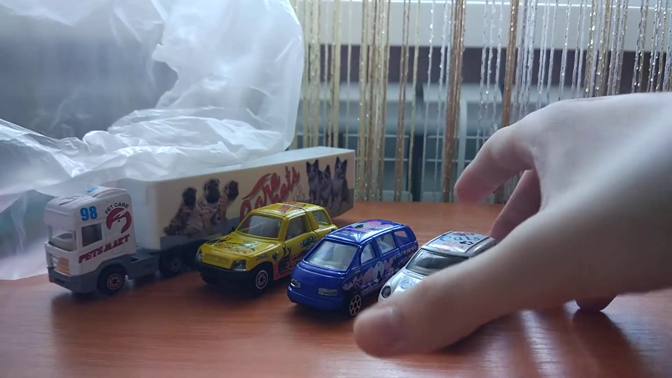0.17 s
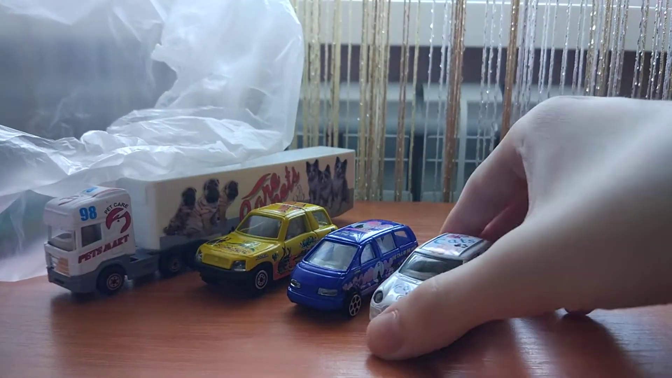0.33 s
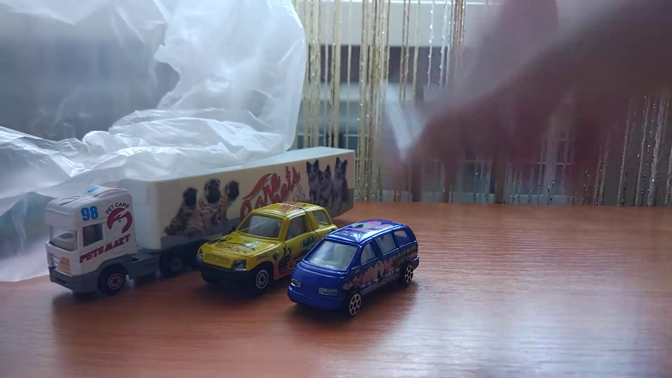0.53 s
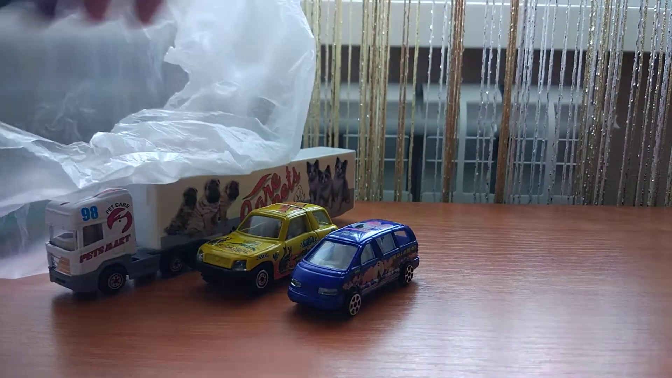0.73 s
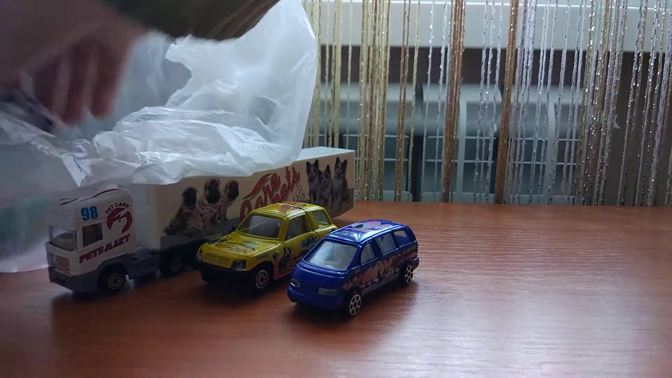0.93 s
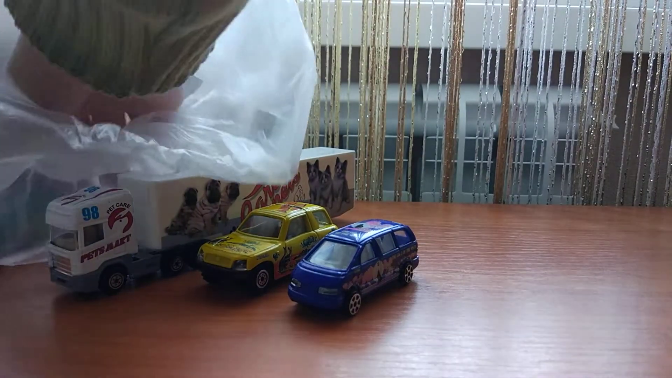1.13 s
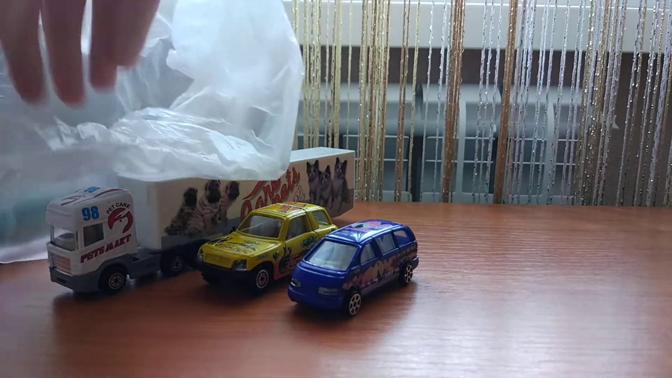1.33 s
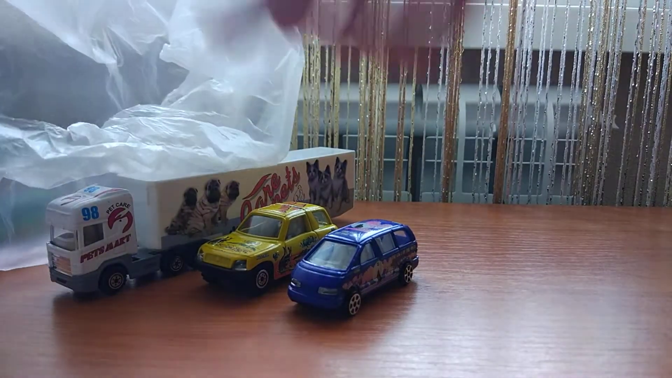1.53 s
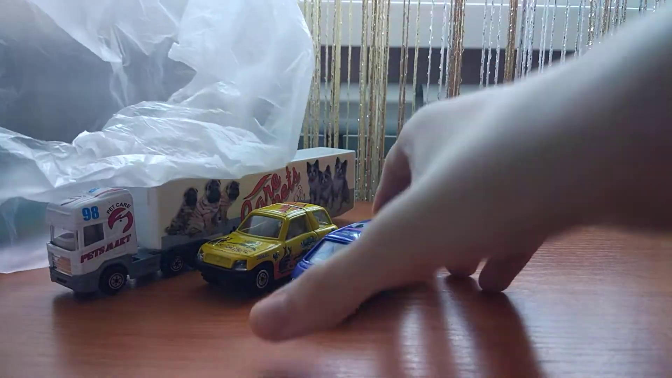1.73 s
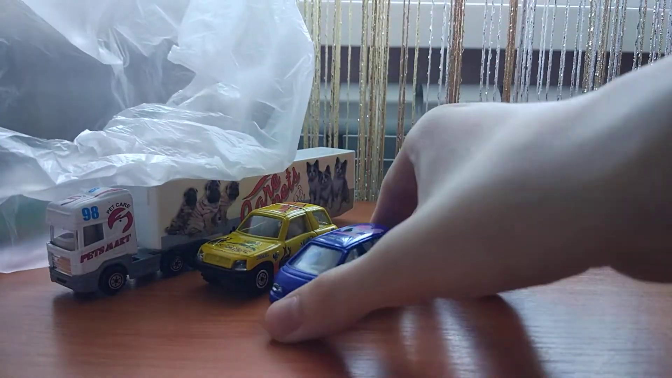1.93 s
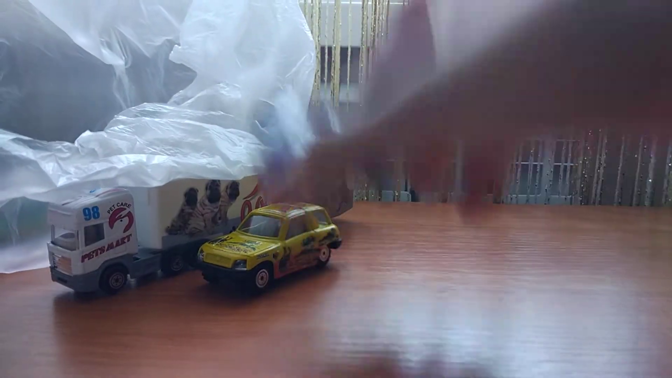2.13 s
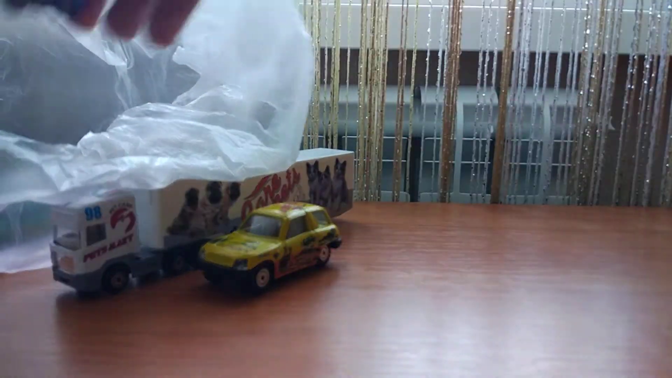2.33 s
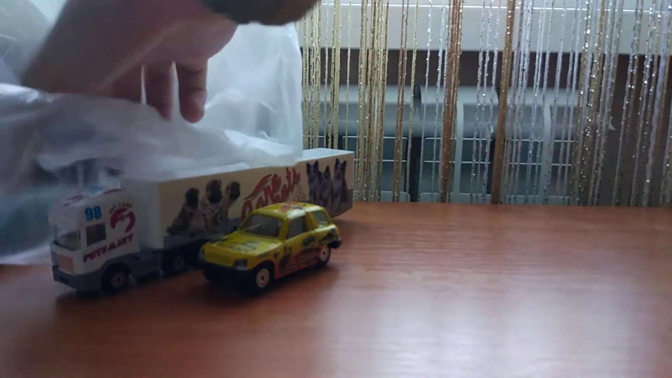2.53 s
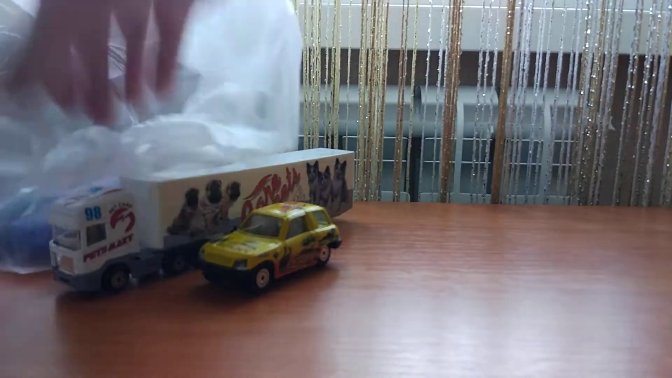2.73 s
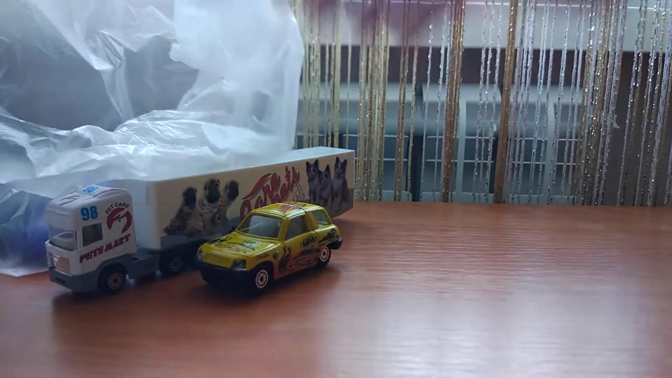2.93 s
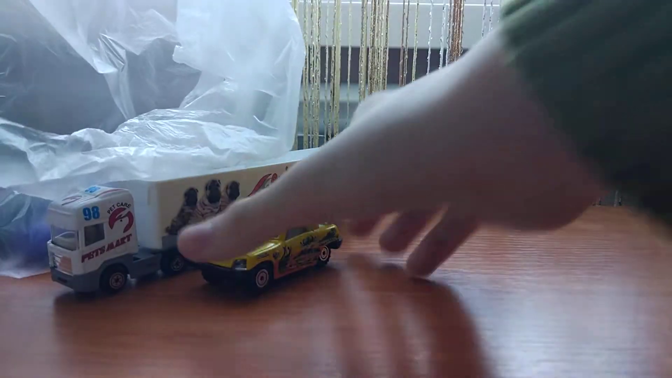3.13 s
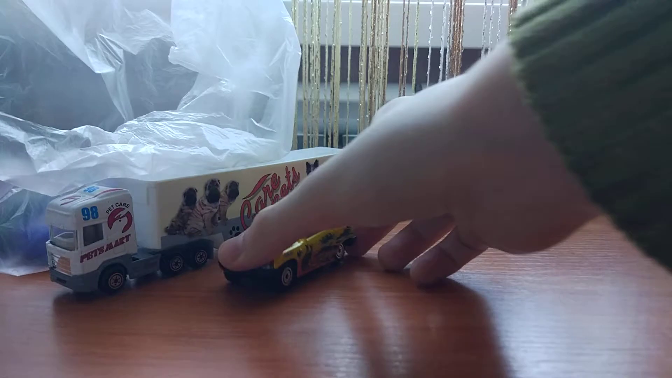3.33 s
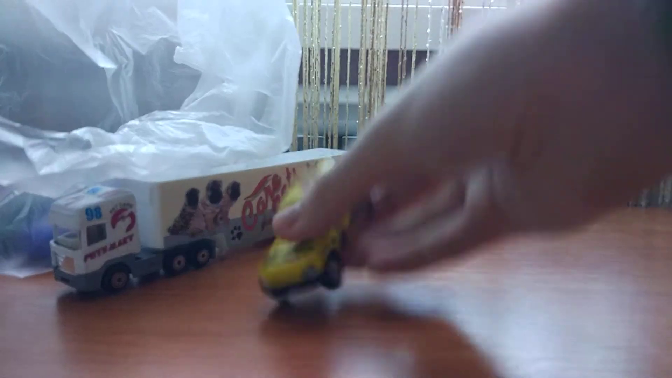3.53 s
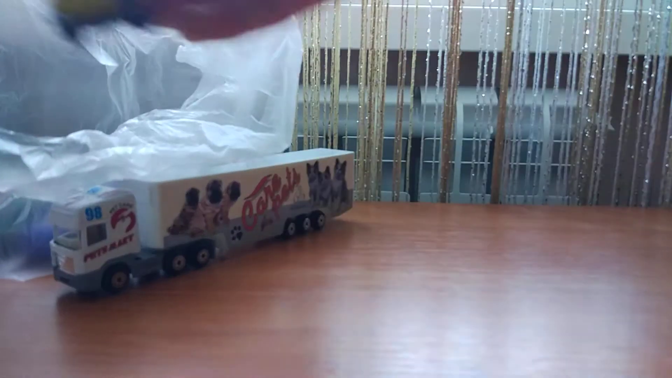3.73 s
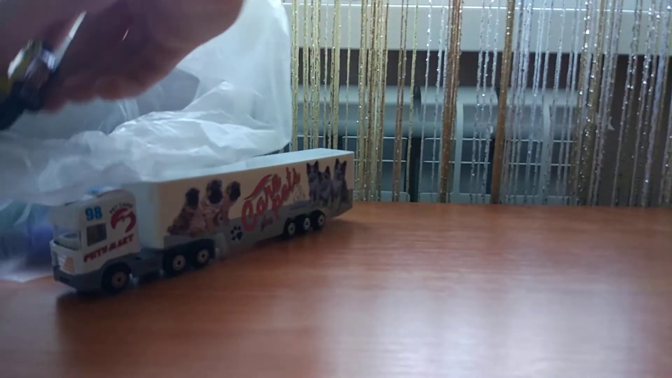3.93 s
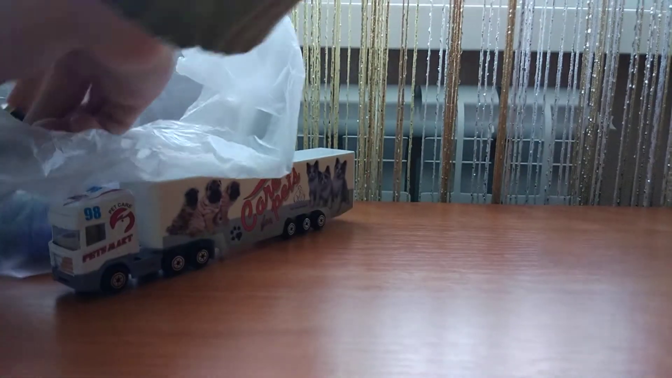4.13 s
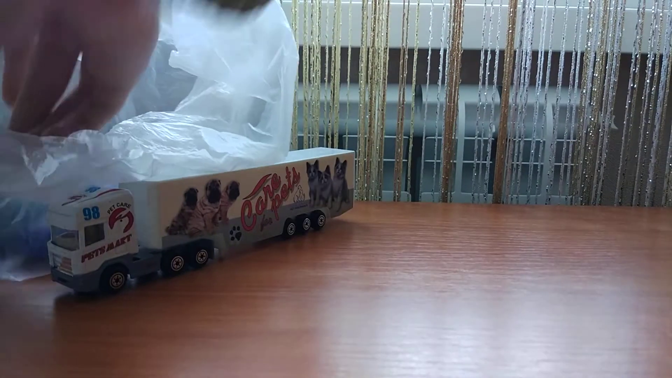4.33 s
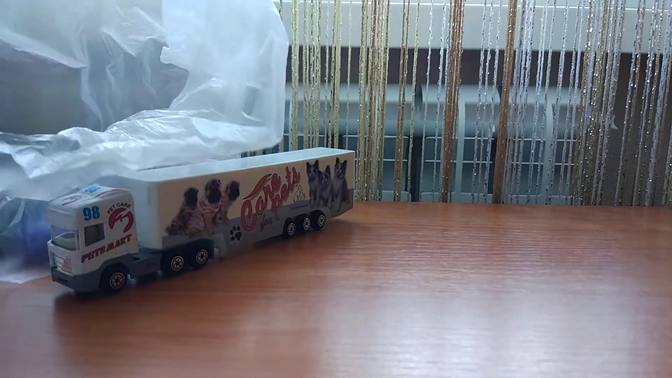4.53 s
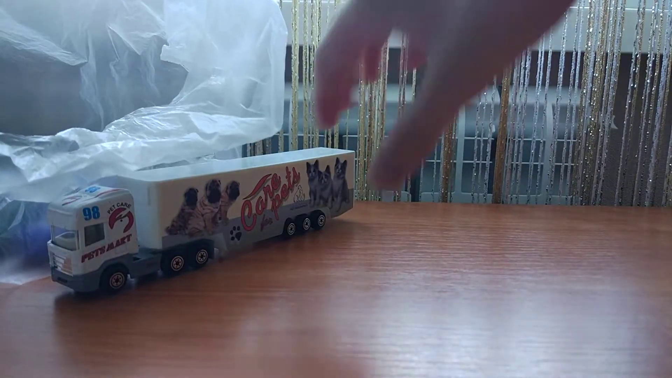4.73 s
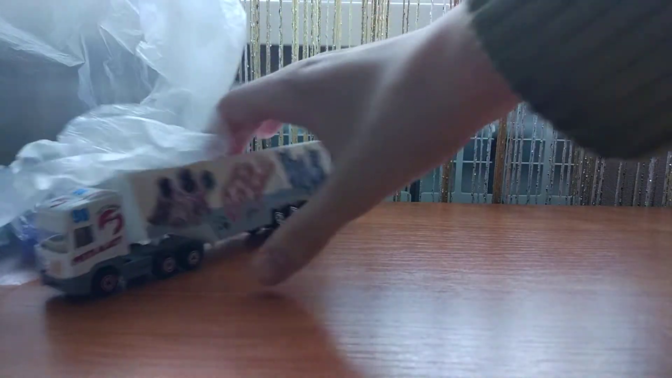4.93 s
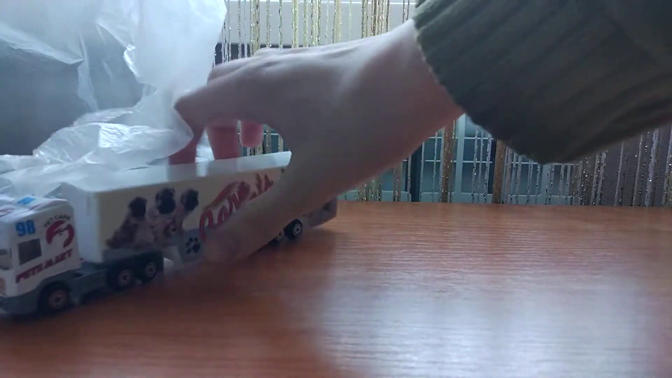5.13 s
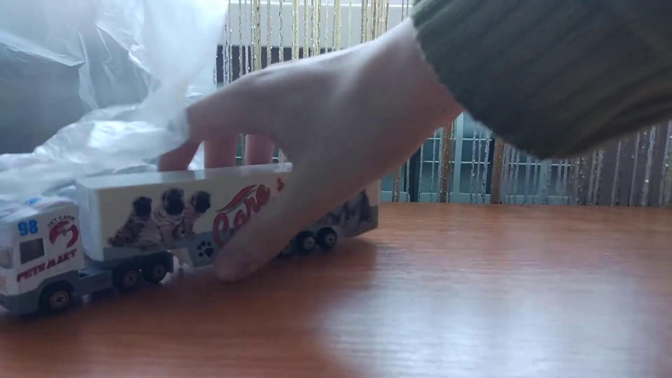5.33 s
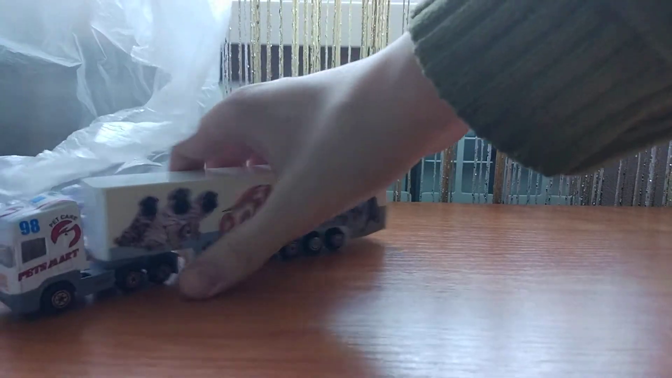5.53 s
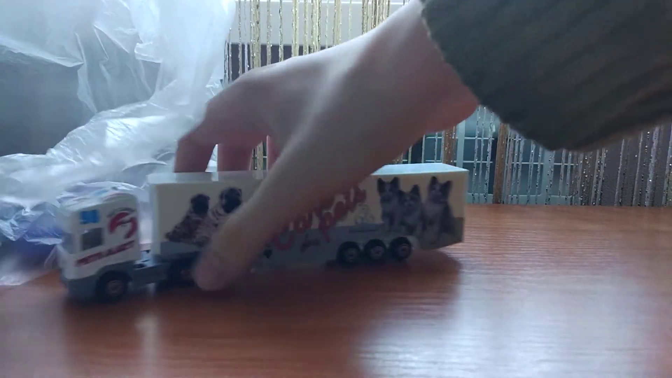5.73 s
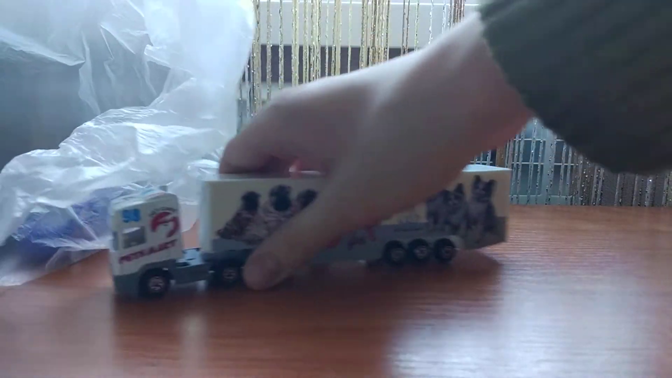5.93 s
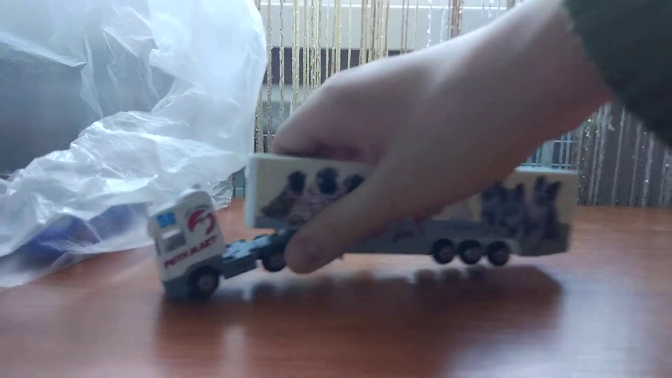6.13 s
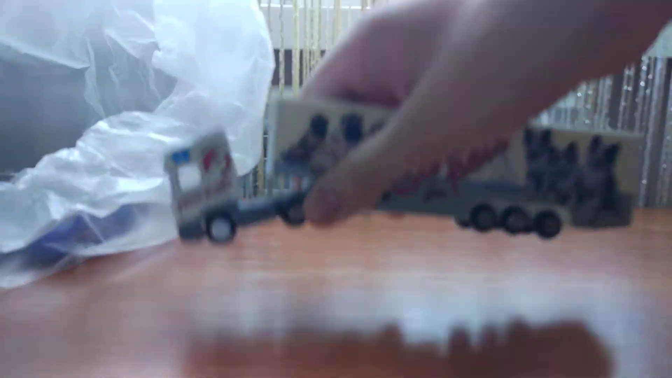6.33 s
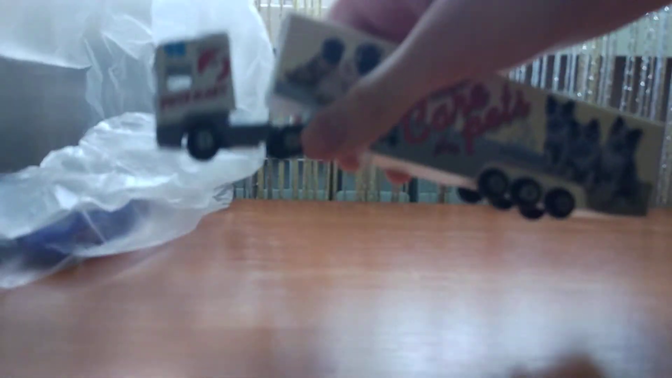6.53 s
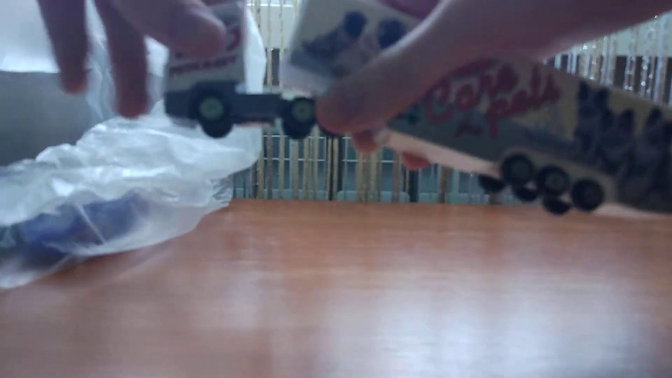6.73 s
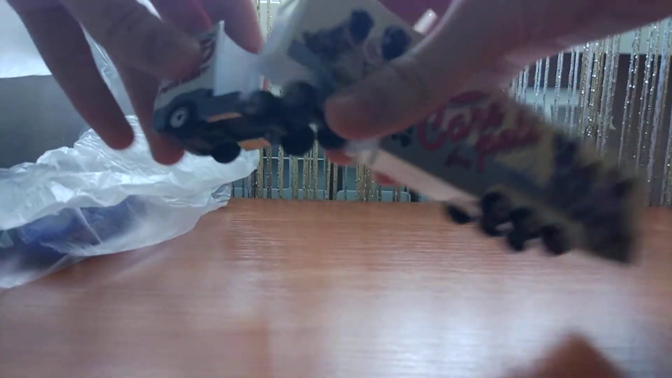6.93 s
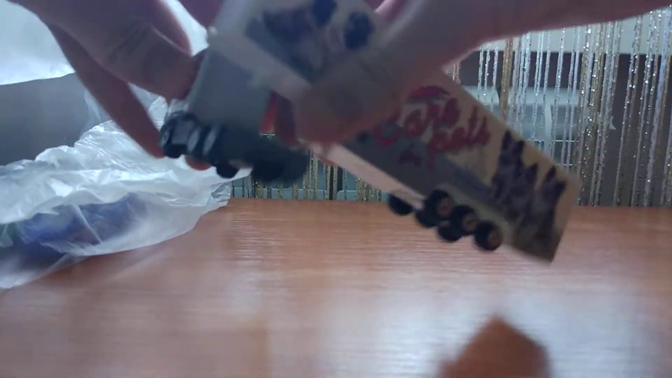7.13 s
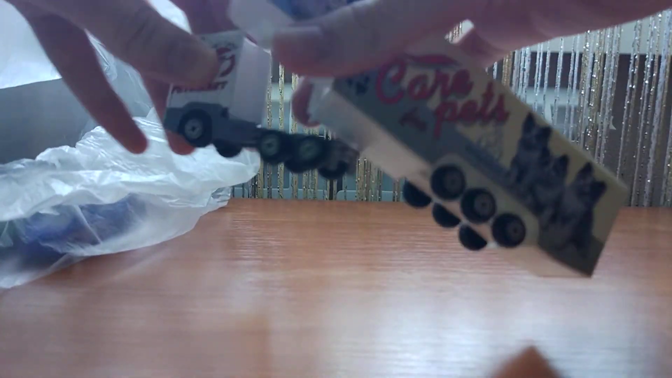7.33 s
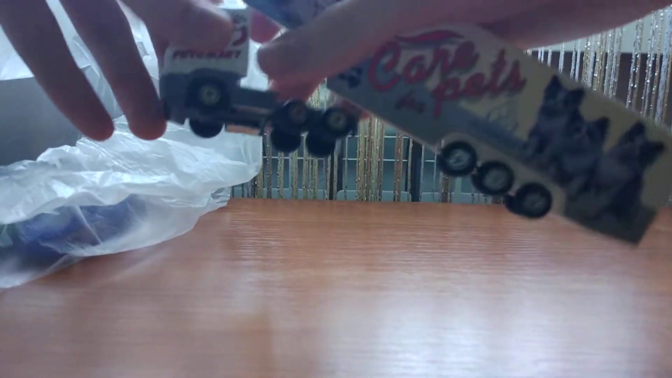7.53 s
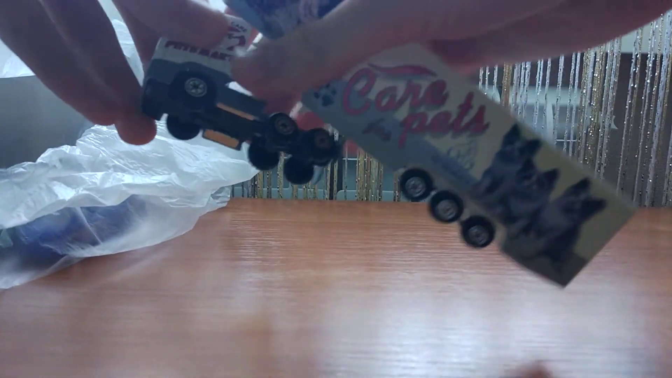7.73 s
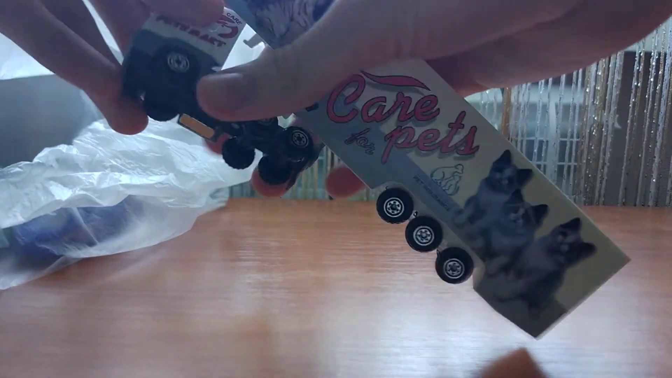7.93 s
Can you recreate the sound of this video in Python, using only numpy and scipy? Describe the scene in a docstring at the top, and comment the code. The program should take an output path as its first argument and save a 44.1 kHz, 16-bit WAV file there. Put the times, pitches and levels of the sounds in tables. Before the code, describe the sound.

A thin plastic bag crinkles as toy cars clatter inside, before a toy truck scrapes across wood and its loose cab clicks.

```python
"""You hear a thin plastic bag rustle and snap while small toy cars clack together inside it.
The cars are picked off a wooden table, where their wheels scrape, spin and drum on the top.
Then a plastic truck is lifted, and its loose cab rattles against the hollow trailer.
The room is small and quiet. Of the microphone's two openings (ports), the right one sounds dull."""
import sys
import numpy as np
from scipy import signal
from scipy.fft import rfft, irfft, next_fast_len
from scipy.io import wavfile
from scipy.ndimage import uniform_filter1d, map_coordinates

SR = 44100
rng = np.random.default_rng(int(sys.argv[2]) if len(sys.argv) > 2 else 0)


def transcribe(u):
    """Save the signal u as a 16-bit wav file named by the first command-line argument.

    u: samples, shape (n,) or (channels, n), limited to [-1, 1]; the rate is SR.
    q: integer samples, one column per channel.
    """
    v = np.clip(np.atleast_2d(u).T, -1, 1)
    q = np.round(v * 32767).astype(np.int16)
    wavfile.write(sys.argv[1], SR, q)


N = 351477
FFT_SIZE = 3 * 2 ** 17
ATTACK_S, SCRAPE_FADE_DB_PER_S = 0.007, 217

# the pitches at which the table top rings: (frequency [Hz], width [Hz], level [dB])
TABLE_RESONANCES = [(160, 9.9, -11.5), (224, 39, 5), (272, 53, 5), (325.5, 71, 2.5), (401.6, 31, -0.5),
                    (639, 24, -12)]
# the same for a toy's plastic shell: (frequency [Hz], width [Hz], level [dB])
SHELL_RESONANCES = [(463, 120, 2.5), (693, 108, 2), (970, 450, -2.5), (1364, 79, 8.5), (1635, 140, 6),
                    (2200, 540, 0), (3160, 380, 2)]
# the tone of the bag's thin film: (frequency [Hz], level [dB])
FILM_TONE = [(80, -38.5), (220, -1.5), (450, -3.5), (1800, -7.5), (3600, -6), (5200, -6), (7000, 1),
             (10000, 3.5), (15000, 1)]


def amp(db):
    """Turn decibels into a factor to multiply by."""
    return 10 ** (np.asarray(db) / 20)


def unit(x):
    """Scale a signal to an average power of 1."""
    return x / np.sqrt(np.mean(x ** 2) + 1e-20)


def along(points, hz):
    """Read between (frequency, value) points on a log frequency axis."""
    f, values = np.transpose(points)
    return np.interp(np.log(hz + 1), np.log(f), values)


def wobble(rate):
    """A smooth random curve that takes rate new values a second."""
    values = rng.standard_normal(int(N * rate / SR) + 4)
    return unit(map_coordinates(values, [np.arange(N) * rate / SR]))


def grid():
    """The frequencies on which filters are drawn."""
    return np.fft.rfftfreq(FFT_SIZE, 1 / SR)


def filtered(x, response):
    """Pass a sound through a filter, given as one gain per frequency."""
    return irfft(rfft(x, FFT_SIZE) * response)[..., :N]


def colour(points):
    """A filter of average power 1 with the given tone."""
    cepstrum = irfft(np.log(amp(along(points, grid()))))
    half = len(cepstrum) // 2
    cepstrum[1:half] *= 2  # folding keeps the filter from sounding before its input
    cepstrum[half + 1:] = 0
    response = np.exp(rfft(cepstrum))
    return response / np.sqrt(np.mean(abs(response) ** 2))


def body(resonances):
    """A filter of average power 1 for an object that rings, weak below its lowest pitch."""
    f = grid()
    response = sum((-1) ** k * amp(db) * 1j * f * width / (hz * hz - f * f + 1j * f * width)
                   for k, (hz, width, db) in enumerate(resonances))
    return response / np.sqrt(np.mean(abs(response) ** 2))


def add(track, at, sound):
    """Mix a sound into the track, starting at a time in seconds."""
    part = track[..., max(round(at * SR), 0):][..., :sound.shape[-1]]
    part += sound[..., :part.shape[-1]]


def stroke(start, length, attack, fade_db_per_s, swell_db=0):
    """The strength of a movement: it rises, holds or swells while it lasts, then fades."""
    t = np.arange(0, N, SR // 500) / SR - start
    swell = swell_db * (np.clip(t / length, 0, 1) - 1)
    return np.clip(t / attack, 0, 1) * amp(swell - fade_db_per_s * np.maximum(t - length, 0))


def together(strokes):
    """Add overlapping movements in power, giving one gain per sample."""
    return np.interp(np.arange(N), np.arange(0, N, SR // 500), np.linalg.norm(strokes, axis=0))


def ports(paths, lead_s, scatter_db):
    """A sound takes three paths: straight to both ports (left lead_s early), and a bounce to each."""
    f = grid()
    direct = filtered(paths[0], np.exp(1j * np.pi * f * lead_s * np.array([[1], [-1]])))
    # low sounds bend around small objects instead of bouncing off
    return direct + amp(scatter_db) * filtered(paths[1:], 1j * f / (1j * f + 1100))


def grains(rate, spread_db):
    """Tiny random clicks, about rate a second and a few of them large, on three paths."""
    size = amp(spread_db * np.clip(rng.standard_normal(N), -3, 2))
    return unit((rng.random(N) < rate / SR) * size * rng.uniform(-1, 1, (3, N)))


def pops(events, t60):
    """Short bursts of noise on three paths; t60 is the seconds they take to fade by 60 dB."""
    track, t = np.zeros((3, N)), np.arange(SR // 50) / SR
    shape = amp(-60 * t / t60) * (1 - np.exp(-t / .0004))
    for at, db in events:
        add(track, at, amp(db) * shape * rng.standard_normal((3, len(t))))
    return track


def contacts(times, levels, rise, t60, chatter_db, chatter_t60, spot_db, spot_hz):
    """Hits on three paths: each is a burst of force, then chatter as the parts settle."""
    track, t = np.zeros((3, N)), np.arange(next_fast_len(SR // 5)) / SR
    hz = np.fft.rfftfreq(len(t), 1 / SR)
    onset = 1 - np.exp(-(t / rise) ** 2)
    burst = onset * amp(-60 * t / t60)
    fade = np.cos(np.pi / 2 * t / t[-1])
    for at, db in zip(times, levels):
        ticks = unit(uniform_filter1d(rng.exponential(size=len(t)) ** 4, size=24))
        chatter = onset * amp(chatter_db - 60 * t / chatter_t60) * np.sqrt(abs(ticks))
        force = (burst / burst.max() + chatter) * rng.standard_normal((3, len(t)))
        # each spot that is hit favours its own pitches, in bands spot_hz wide
        bands = map_coordinates(rng.uniform(-1, 1, len(hz)), [hz / spot_hz], mode="nearest")
        spot = unit(amp(spot_db * bands))
        add(track, at, amp(db) * irfft(rfft(force) * spot, len(t)) * fade)
    return track


def ringing(notes, t):
    """The fading notes of an object struck once, a little different each time."""
    return sum(amp(db + 2 * rng.normal() - 60 * t / t60)
               * np.sin(2 * np.pi * hz * rng.normal(1, .004) * t) for hz, db, t60 in notes)


def air():
    """A steady room murmur, shared by both ports in the bass, with a faint hiss."""
    # the tone of the quiet room: (frequency [Hz], level [dB])
    murmur_tone = [(60, -46), (140, -15), (210, 0), (450, -12), (3500, -15), (15000, -20.5)]
    shared, side = filtered(rng.standard_normal((2, N)), colour(murmur_tone))
    side = filtered(side, grid() / (grid() + 500))
    return amp(-62) * np.array([shared + side, shared - side])


def room(x):
    """The walls give each port a short wash of echoes that lasts longest at middle pitches."""
    # how long the echoes last: (frequency [Hz], time to fade by 60 dB [s])
    echo_times = [(200, 0.14), (1500, 0.28), (6000, 0.23), (15000, 0.12)]
    hz, t, noise = signal.stft(rng.standard_normal((2, SR // 2)), SR, nperseg=256)
    fade = amp(-60 * t / along(echo_times, hz)[:, None])
    onset = 1 - np.exp(-t / 0.00067)
    tail = signal.istft(noise * fade * onset, SR, nperseg=256)[1]
    return signal.fftconvolve(x[None], tail / np.linalg.norm(tail[0]), axes=1)[:, :N]


def chafing():
    """A spinning wheel rubs its axle once a turn, in quick slips that make both ring."""
    # a wheel spins: (start [s], length [s], level [dB])
    spins = [(0.625, 0.028, -53.5), (2.04, 0.26, -65), (3.28, 0.19, -50.5), (7.76, 0.063, -49)]
    # the pitches of wheel and axle: (frequency [Hz], width [Hz], level [dB])
    wheel_resonances = [(1420, 120, -7), (1910, 110, 8), (2580, 2200, -3.5)]
    turns_per_s, sharpness = 31.74, 6.3  # sharper means a briefer touch
    start, length, db = np.transpose(spins)[..., None]
    rub = together(amp(db) * stroke(start, length, ATTACK_S, SCRAPE_FADE_DB_PER_S))
    touch = unit(np.exp(sharpness * np.cos(2 * np.pi * turns_per_s * np.arange(N) / SR)))
    return filtered(rub * touch * grains(4000, spread_db=0), body(wheel_resonances))


def juddering():
    """A gripped toy sticks and slips in step with the table top: a short wooden groan."""
    # the toy judders: (start [s], length [s], level [dB])
    judders = [(0.264, 0.076, -48.5), (1.891, 0.047, -41), (3.254, 0.02, -49)]
    groan_hz = 246
    start, length, db = np.transpose(judders)[..., None]
    grip = together(amp(db) * stroke(start, length, ATTACK_S, SCRAPE_FADE_DB_PER_S))
    cycles = np.cumsum(groan_hz * (1 + .05 * wobble(50))) / SR
    paths = np.zeros((3, N))
    paths[0] = grip * unit(amp(2 * wobble(70)) * np.sin(2 * np.pi * cycles))
    return paths


def dragging():
    """Wheels and fingers catch on the wood in tiny slips, rattling the toy and drumming the table."""
    # a toy is dragged: (start [s], length [s], scrape [dB], drumming [dB])
    drags = [(1.252, 0.24, -49, -46.5), (1.876, 0.072, -52.5, -50.5), (2.716, 0.13, -45, -41.5),
             (3.125, 0.2, -64.5, -58), (3.26, 0.027, -44.5, -48.5), (3.303, 0.18, -53, -63),
             (4.429, 0.077, -42.5, -39), (4.886, 0.44, -40.5, -47.5), (5.035, 0.12, -40, -42.5),
             (5.53, 0.24, -43, -48.5), (5.824, 0.041, -33, -40.5), (5.87, 0.21, -41, -53)]
    # the tone of scraping on wood: (frequency [Hz], level [dB])
    scrape_tone = [(50, -46), (200, -11), (800, -3.5), (1400, -5), (2400, 2), (4600, -8), (15000, -12)]
    start, length, scrape_db, drum_db = np.transpose(drags)[..., None]
    scrape = together(amp(scrape_db) * stroke(start, length, ATTACK_S, SCRAPE_FADE_DB_PER_S))
    drum = together(amp(drum_db) * stroke(start, length, ATTACK_S, fade_db_per_s=179))
    catches = amp(3.3 * wobble(85))
    slips = scrape * catches * grains(5000, spread_db=2)
    rattle = amp(-3) * scrape * catches * grains(170, spread_db=1)
    bumps = amp(4) * drum * grains(830, spread_db=6)
    toy = filtered(slips, colour(scrape_tone)) + filtered(rattle, body(SHELL_RESONANCES[2:]))
    return toy + filtered(bumps, body(TABLE_RESONANCES))


def axles():
    """Loose, thin steel axles hit their stops with high ticks."""
    # each tick: (time [s], level [dB])
    ticks = [(7.1627, -18.5), (7.607, -26), (7.6905, -17), (7.8476, -21.5), (7.866, -45)]
    pitch_hz, width_hz = 10200, 1200
    return filtered(pops(ticks, t60=0.011), body([(pitch_hz, width_hz, 0)]))


def truck():
    """The cab swings on its hitch: dry clicks, and knocks that sound the hollow trailer."""
    # the truck bumps and its cab rattles: (time [s], click [dB], knock [dB])
    rattles = [(4.956, -22, -32), (4.972, -29, -32), (5.121, -22.5, -29), (5.6185, -24, -33.5),
               (5.701, -44, -40), (5.8112, -21.5, -30.5), (6.093, -30.5, -45), (6.7141, -30, -43.5),
               (6.9244, -29.5, -37), (6.9668, -20.5, -34), (7.1379, -25.5, -50.5), (7.3198, -26.5, -38),
               (7.341, -12.5, -27), (7.3519, -16.5, -29.5), (7.409, -26, -32.5), (7.555, -29.5, -40),
               (7.5683, -16.5, -32), (7.5905, -18.5, -38), (7.664, -22, -32), (7.6788, -27.5, -33.5),
               (7.8464, -23, -38.5), (7.9275, -32.5, -43.5)]
    # bumps on the trailer, lower for a softer touch: (time [s], pitch [Hz], level [dB])
    taps = [(5.8114, 910, -19), (6.9255, 524, -25.5), (6.9672, 473, -23.5), (7.3203, 650, -26),
            (7.664, 420, -30.5)]
    # the tone of a plastic click: (frequency [Hz], level [dB])
    click_tone = [(80, -22), (1000, -9.5), (1800, -6), (3200, 1.5), (5000, 2.5), (6600, 3), (11000, 7.5),
                  (12500, -1), (16000, -8)]
    times, click_db, knock_db = np.transpose(rattles)
    click = contacts(times, click_db - 7.5, rise=0.0013, t60=0.012,
                     chatter_db=-2.5, chatter_t60=0.19, spot_db=11, spot_hz=554)
    knock = contacts(times, knock_db + 2, rise=0.0006, t60=0.024,
                     chatter_db=-8, chatter_t60=0.11, spot_db=6, spot_hz=200)
    # the first touch is one sharp push on the shell, strongest after 0.1 ms
    age = np.arange(SR // 200) / SR / 0.0001
    for at, db in zip(times, knock_db):
        add(knock[0], at, amp(db + 16) * age * np.exp(-age))
    for at, hz, db in taps:
        cycles = hz * np.arange(SR // 50) / SR
        add(knock[0], at, amp(db) * np.sin(2 * np.pi * cycles) * np.exp(-cycles))
    return filtered(click, colour(click_tone)) + filtered(knock, body(SHELL_RESONANCES))


def stirring():
    """How hard the bag moves: each push works the film, then its creases slowly creep back."""
    # a hand or toy pushes in: (start [s], length [s], final level [dB], swell up to it [dB])
    pushes = [(-0.03, 0.0098, -47.5, 2), (0.768, 0.17, -54, 6), (0.949, 0.51, -44, -1),
              (2.346, 0.25, -36, 21.5), (2.652, 0.11, -46.5, -5.5), (2.917, 0.05, -50, 8),
              (3.132, 0.36, -53, 11), (3.57, 0.14, -57, 6), (3.825, 0.5, -47.5, 9.5),
              (4.288, 0.25, -39, 1.5), (4.828, 0.35, -46.5, -3), (5.296, 0.36, -55.5, -3.5),
              (6.47, 0.45, -53.5, 2.5)]
    start, length, db, swell_db = np.transpose(pushes)[..., None]
    pushing = amp(db) * stroke(start, length, attack=0.0092, fade_db_per_s=186, swell_db=swell_db)
    creep = stroke(start, length, attack=length, fade_db_per_s=31, swell_db=swell_db)
    settling = amp(db - 4.5) * length * creep  # a longer push leaves more to settle
    return np.hypot(together(np.hypot(pushing, settling)), amp(-69.5))  # never quite still


def facets(activity, rate, hz, ring_cycles):
    """Tiny flat bits of film flip and ring at their own pitches, rate a second at full activity."""
    at, chance, size, pitch, *paths = rng.random((int(rate * N / SR), 7)).T[..., None]
    k = np.arange(SR // 200)
    start = (at * (N - len(k))).astype(int)
    cycles = hz * 2 ** (pitch - .5) * k / SR
    rings = 10 ** size * np.sin(2 * np.pi * cycles) * np.exp(-cycles / ring_cycles)
    rings *= np.sqrt(3 * N / np.sum(rings ** 2)) * (chance < activity[start])
    return np.array([np.bincount((start + k).ravel(), (rings * (2 * p - 1)).ravel(), N) for p in paths])


def patchy(x, depth_db):
    """Each fold has its own tone: small patches of time and pitch get louder or softer at random."""
    spectrum = signal.stft(x, nperseg=128)[2]
    patches = uniform_filter1d(rng.standard_normal(spectrum.shape[1:]), size=10, axis=0)
    patches = uniform_filter1d(patches, size=5, axis=1)
    return signal.istft(spectrum * amp(depth_db * unit(patches)))[1][:, :N]


def bag():
    """The moving film gives a hiss of sliding folds and clumps of tiny crinkles."""
    stir = stirring()
    folds = wobble(130)
    slide = amp(3 * folds) * grains(8000, spread_db=2)
    # gentle stirring gives a few separate crinkles; hard stirring blurs them together
    activity = np.clip(stir / amp(-40), .003, 1) ** .6
    clumps = amp(2.5 * np.clip(folds + wobble(330), -2, 2) - 5)
    crinkle = clumps * facets(activity, rate=900, hz=11500, ring_cycles=2) / np.sqrt(activity)
    film = patchy(slide + crinkle, depth_db=2.5)
    return filtered(amp(6.5) * stir * film, colour(FILM_TONE))


def snaps():
    """Single creases of the bag pop over with a dry tick."""
    # each crease: (time [s], level [dB])
    creases = [(0.2535, -32), (0.3628, -27.5), (0.622, -35), (0.7427, -26), (1.163, -10.5), (1.8438, -30.5),
               (2.022, -32), (2.061, -27), (2.476, -23), (3.0412, -25), (3.7672, -25.5), (6.206, -27),
               (6.388, -31), (7.0703, -23), (7.2239, -22.5)]
    return filtered(pops(creases, t60=0.0092), colour(FILM_TONE))


def cars():
    """Each hit clacks the cars, rings their metal, cracks the film between them and thumps the table."""
    # toys hit each other and the table: (time [s], clack [dB], thud [dB], knock [dB], crack [dB])
    blows = [(0.44, -42, -75, -46, -41.5), (1.286, -30, -51, -50, -54), (1.339, -27, -31.5, -44, -37),
             (1.3929, -2, -29, -30, -24), (1.442, -5, -38, -44, -53), (1.4677, -14, -51, -33, -35),
             (1.9108, -28, -51, -65, -41.5), (2.2325, -35.5, -91, -99, -49),
             (2.7053, -15, -20.5, -26.5, -17), (2.724, -32.5, -48, -53, -22.5),
             (2.7414, -14.5, -23, -25, -21), (2.777, -34, -30.5, -25, -18), (2.7998, -13, -48, -35, -23.5),
             (2.819, -19, -30, -26.5, -27.5), (2.8358, -17, -37, -35, -25),
             (2.8577, -18, -39.5, -37, -26.5), (3.295, -22, -46, -41.5, -48),
             (3.5553, -30, -70, -42, -42.5), (4.3187, -14.5, -36, -34.5, -23), (4.39, -9, -13.5, -19, -20),
             (4.4221, -34, -24, -14, -20.5), (4.441, -41, -24, -22, -54), (4.4593, -34, -28.5, -22, -59),
             (5.1403, -12.5, -44, -20.5, -22.5), (5.2283, -6.5, -51, -26, -24.5)]
    # the tone of hard bodies clacking: (frequency [Hz], level [dB])
    clack_tone = [(80, -40), (600, -25), (1500, -3), (2600, 0.5), (3200, 9), (4400, 1), (9000, -1),
                  (15000, -47)]
    # the tone of a hollow knock: (frequency [Hz], level [dB])
    knock_tone = [(60, -50), (200, -15), (450, 15.5), (850, 5), (1400, 10), (2200, 9.5), (4000, 0),
                  (12000, -21)]
    # the tone of the film cracking: (frequency [Hz], level [dB])
    crack_tone = [(2000, -18), (6000, 5), (11000, 4.5), (15500, -3.5)]
    # a metal car rings: (frequency [Hz], level [dB], time to fade by 60 dB [s])
    metal_notes = [(1405, -2, .33), (3510, -7, .12), (4240, -4, .12), (4865, -7, .12)]
    # the table and the things on it ring: (frequency [Hz], level [dB], time to fade by 60 dB [s])
    table_notes = [(335, 3, 0.33), (450, -5, 0.25), (660, -3, 0.22), (748, -26, 1.3)]
    rebound_s, rebound_db = 0.0046, -3.5  # a car lands on one end, then on the other
    times, clack_db, _, knock_db, crack_db = np.transpose(blows)
    clack = contacts(times, clack_db - 9, rise=0.0023, t60=0.014,
                     chatter_db=-8, chatter_t60=0.041, spot_db=5, spot_hz=288)
    knock = contacts(times, knock_db - 0.5, rise=0.0004, t60=0.05,
                     chatter_db=-11.5, chatter_t60=0.22, spot_db=2, spot_hz=150)
    crack = contacts(np.r_[times, times + rebound_s], np.r_[crack_db, crack_db + rebound_db] + 6,
                     rise=0.0012, t60=0.019, chatter_db=-9, chatter_t60=0.13, spot_db=14, spot_hz=512)
    thump, ring, t = np.zeros(N), np.zeros(N), np.arange(SR // 2) / SR
    for at, hit_db, thud_db, _, _ in blows:
        # a heavier hit makes a stiffer contact, which wakes higher pitches of the table
        cycles = 380 * 2 ** ((thud_db + 27.5) / 32) * t
        add(thump, at, amp(thud_db - 3.5) * np.sin(2 * np.pi * cycles) * np.exp(-cycles / 1.04))
        add(ring, at, amp(hit_db - 31) * ringing(metal_notes, t))
    add(ring, 4.4225, amp(-24) * ringing(table_notes, t))  # after the heaviest drop
    paths = filtered(clack, colour(clack_tone)) + filtered(knock, colour(knock_tone))
    paths += filtered(crack, colour(crack_tone))
    jolt = amp(-17)  # part of each thump reaches the microphone through the table itself
    paths[0] += ring + filtered(thump, body(TABLE_RESONANCES) + jolt)
    return paths


def scene():
    """The bag lies to the left, the toys stand in front, and the truck is held to the right."""
    # a car tumbles inside the bag: (start [s], end [s], lean to the right [dB])
    tumbles = [(1.25, 1.8, 2), (2.66, 3.02, 2), (4.28, 4.85, 2.5)]
    bag_lead_s, table_lead_s, hand_lead_s = 0.00019, -0.000021, -0.00012  # left port's head start
    film, creases, blows = bag(), snaps(), cars()
    rattles = truck() + amp(4.5) * axles()
    wheels = dragging() + juddering() + chafing()
    start, end, lean_db = np.transpose(tumbles)[..., None]
    t = np.arange(N) / SR
    spans = np.clip(np.minimum(t - start, end - t) / ATTACK_S, 0, 1)
    inside = spans.sum(axis=0)
    lean = amp((spans * lean_db).sum(axis=0) / 2)
    from_bag = ports(film + creases, bag_lead_s, scatter_db=2.5)
    from_bag += np.array([1 / lean, lean]) * ports(inside * blows, bag_lead_s, scatter_db=2.5)
    from_table = ports(wheels + (1 - inside) * blows, table_lead_s, scatter_db=0)
    from_hand = ports(rattles, hand_lead_s, scatter_db=5)
    near = from_bag + amp([[-1], [1]]) * (from_table + from_hand)
    into_room = amp(-2.5) * film + amp(-9) * (wheels + blows + rattles + creases)
    return amp(-5) * near + room(into_room[0]) + air()


def record(dry):
    """The right port loses the high treble, and neither port passes the very highest sounds."""
    # the tone of the right port: (frequency [Hz], gain [dB])
    dull_tone = [(600, 1.5), (1400, -0.5), (5000, 1), (6500, -3.5), (8200, -9), (11000, -20)]
    top_hz = 16100
    f = grid()
    left, right = dry
    right = filtered(right, amp(along(dull_tone, f)))
    return filtered(np.array([left, right]), 1.0 * (f < top_hz))


dry = scene()
out = record(dry)
transcribe(out)
```